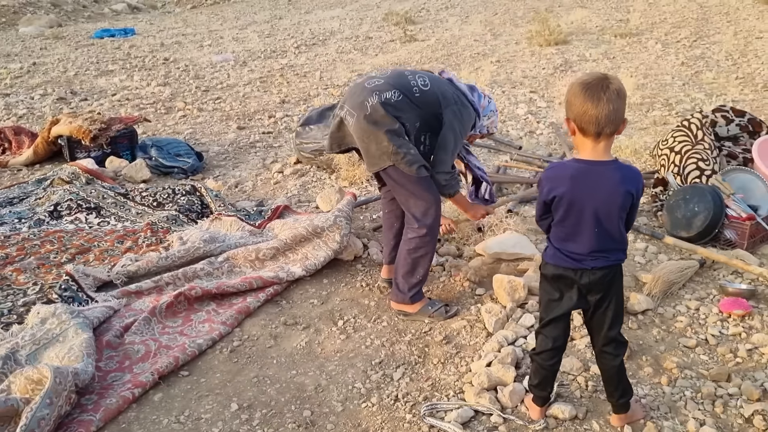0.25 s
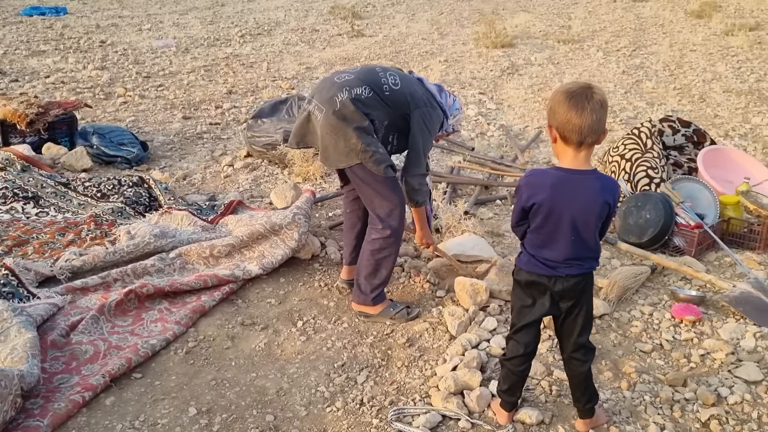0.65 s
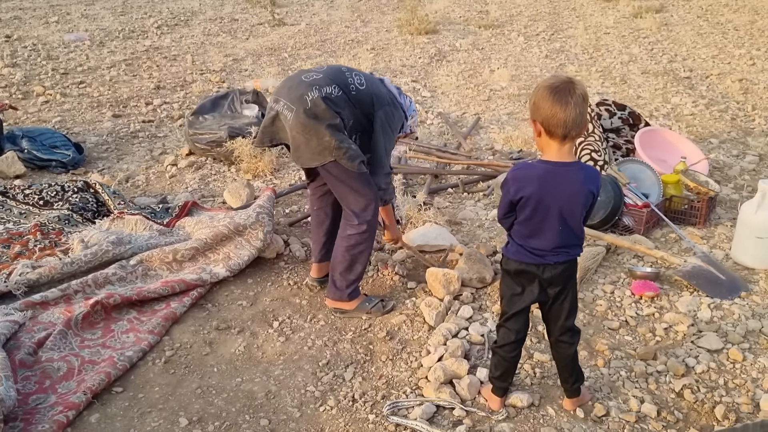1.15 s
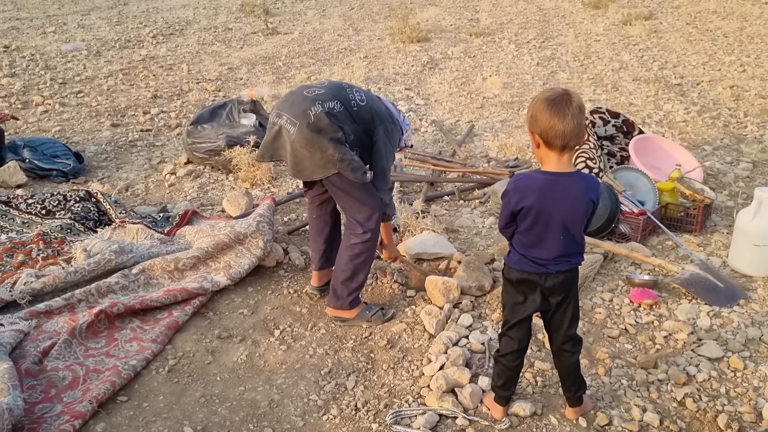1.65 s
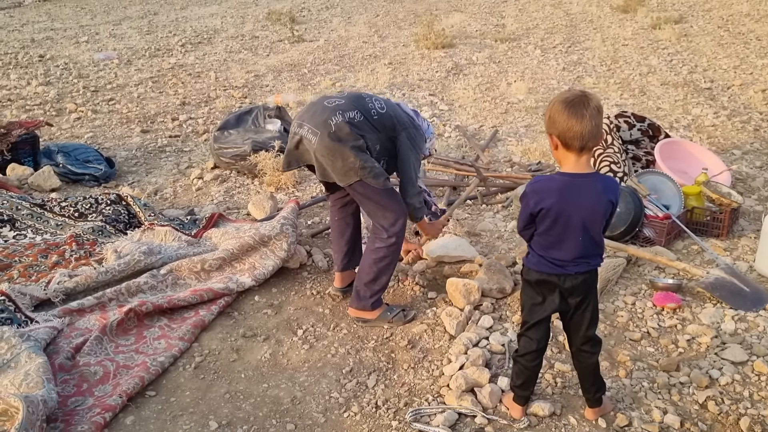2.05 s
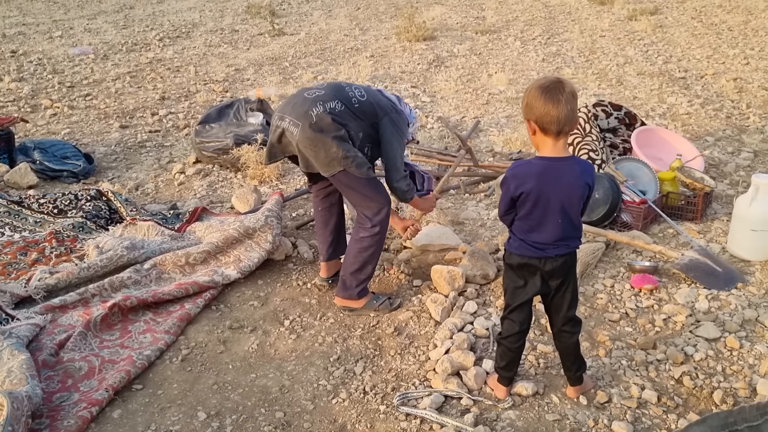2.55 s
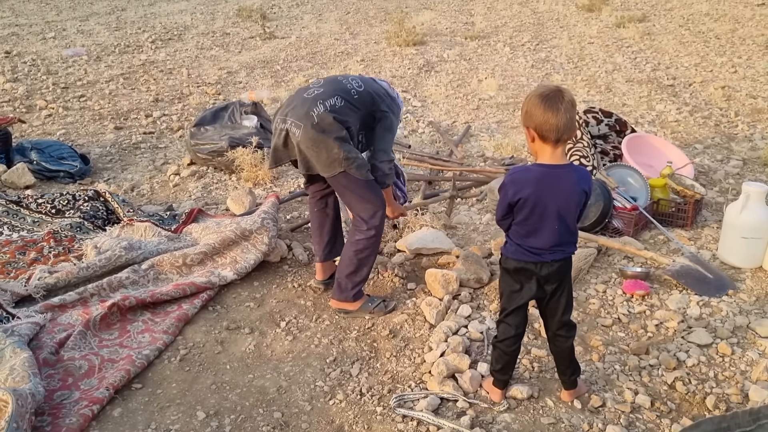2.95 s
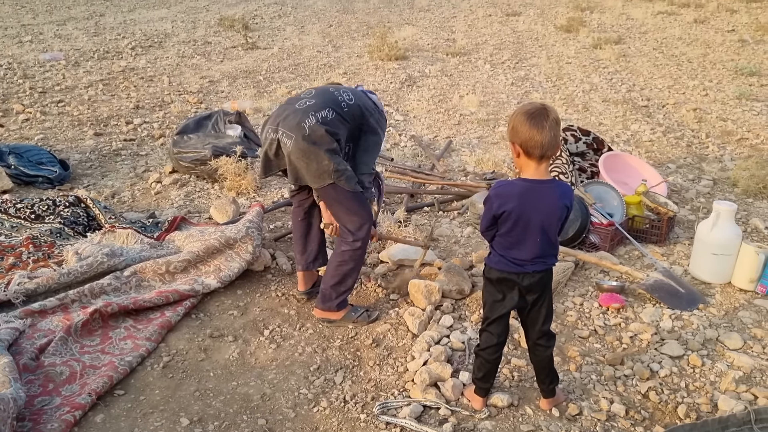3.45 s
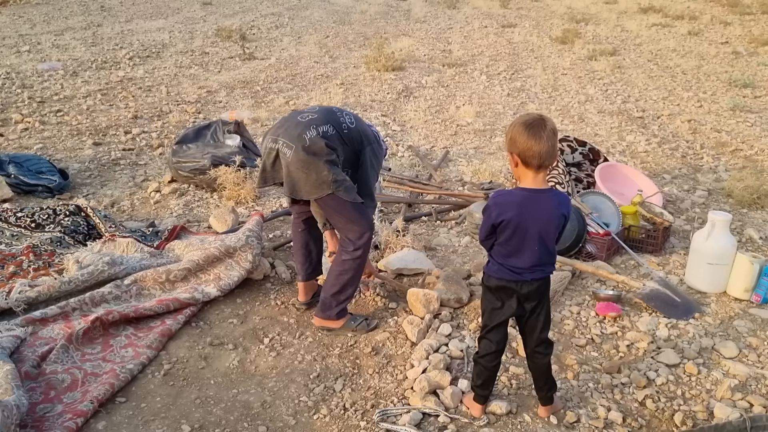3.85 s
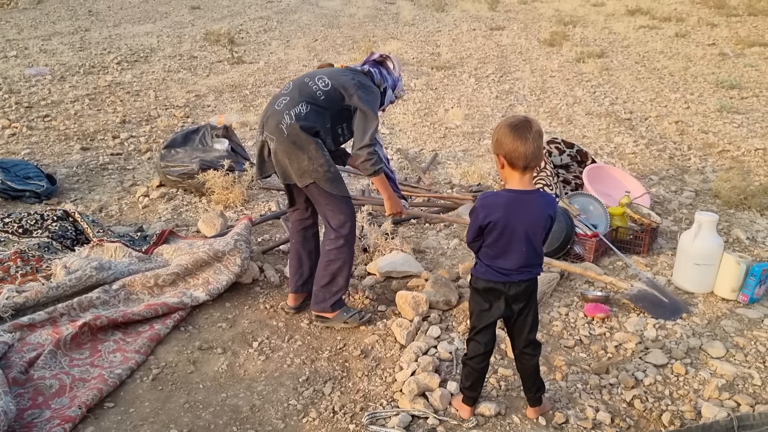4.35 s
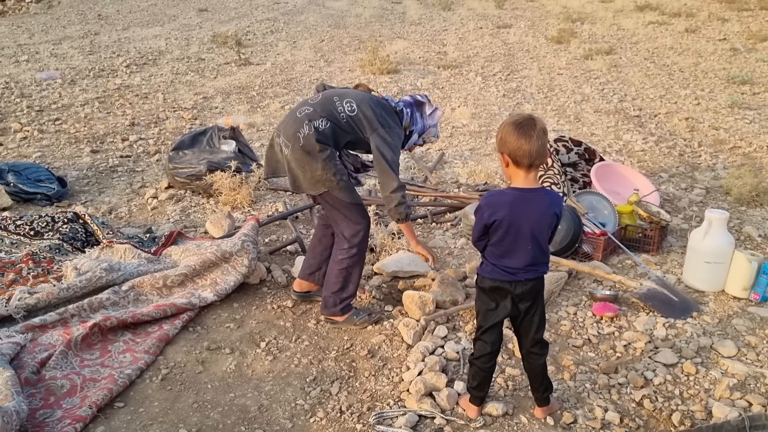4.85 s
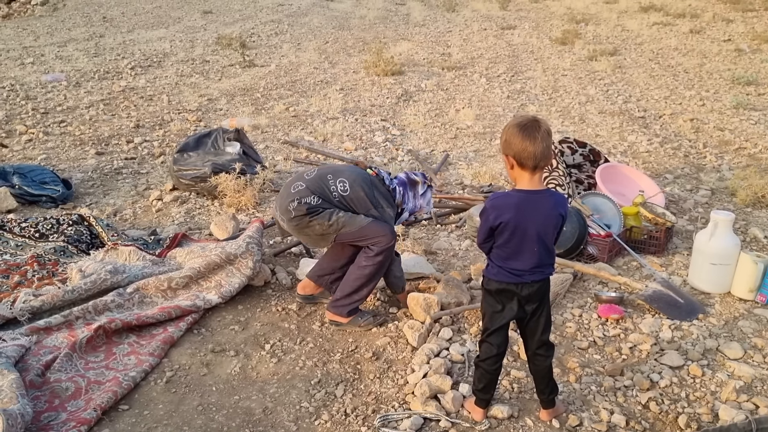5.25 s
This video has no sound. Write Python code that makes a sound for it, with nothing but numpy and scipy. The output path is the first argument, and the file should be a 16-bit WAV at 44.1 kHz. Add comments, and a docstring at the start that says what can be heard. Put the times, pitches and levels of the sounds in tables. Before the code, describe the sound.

On open dry ground, someone strikes stone on stone at a steady pace, about twice a second, each blow a short bright clack with a tiny crack. Small pebbles tick between. After a gap, a cluster of hollower knocks on a flat slab comes near the end. Wind thumps low on a phone a few metres away, strongest in the middle, over faint rustle and hiss.

```python
"""Stones are knocked together and set down on dry, open ground a few metres from a phone.
Each blow sets off fading tones, a crack and a thud: mostly a hand stone, and a flat slab around 4.6 s.
Pebbles tick as clicks and puffs of noise, and scraped grit is grainy noise that swells and fades.
Gusty wind, made of low noise and short thumps, buffets the two microphone ports, each in its own way.
Cloth and dust rustle softly over a thin hiss."""
import sys
import numpy as np
from scipy import signal
from scipy.fft import rfft, irfft, next_fast_len
from scipy.io import wavfile
from scipy.ndimage import uniform_filter1d, map_coordinates

SR = 44100
rng = np.random.default_rng(int(sys.argv[2]) if len(sys.argv) > 2 else 0)


def master(y):
    """Save y as 16-bit WAV."""
    cut = np.clip(np.atleast_2d(y).T, -1, 1)
    pcm = np.round(cut * 32767)  # scale
    wavfile.write(sys.argv[1], SR, pcm.astype(np.int16))


N = 242550  # length in samples

# In the tables, pan_db is left minus right, and density_db is the relative strength per Hz of a noise. blows of
# the hand stone; the faint rows at .5035 s and 3.279 s are echoes ringing about 14 ms after the loud blows
# before them; crack_db and thud_db are relative to the ring, treble falls off at top_hz: start_s, level_db,
# ring_hz, second_ring_hz, crack_db, thud_db, length_factor, pan_db, top_hz
HAND_BLOWS = [(.4886, -10, 5230, 4170, -3, -18, 0.44, -3.5, 14300),
              (.5035, -38.5, 4960, 4960, -11, -25, 0.72, -1.5, 9100),
              (1.0532, -32.5, 4300, 3920, 1, -14.5, 0.2, 9.5, 14000),
              (1.0578, -33.5, 4680, 3680, 8.5, -0.5, 0.14, -3, 6800),
              (1.599, -12.5, 3890, 5280, -2, -15, 0.39, -1, 13200),
              (1.6526, -52.5, 1360, 3180, 6, -12, 2.5, 1.5, 4700),
              (2.1605, -11, 7010, 4560, -8, -18, 0.56, 0, 8630),
              (2.2223, -40, 3000, 6200, 7.5, -6, 0.57, 5, 6950),
              (2.72, -38, 4800, 3870, -1, 11, 0.58, 1.5, 7860),
              (2.7721, -39.5, 7800, 6900, 9.5, 4, 0.25, -3, 8720),
              (3.258, -17, 3000, 6970, -6.5, -4, 0.94, -2, 14800),
              (3.279, -44, 4950, 4950, 2.5, -7, 0.85, 4.5, 8010),
              (3.2973, -46.5, 5230, 7080, -1, 10.5, 1.2, 1, 7470),
              (3.808, -30.5, 4800, 3870, 2, 1.5, 0.44, 4.5, 11000),
              (5.0245, -55, 1400, 2550, 9.5, 10, 1.43, 5.5, 4590)]
# knocks on the slab, mostly around 4.6 s: same columns as the blows
SLAB_KNOCKS = [(3.947, -58, 1495, 3800, 0, -27, 4, 3, 4500),
               (4.5125, -24.5, 2970, 1495, -1.5, -16, 1.03, 1.5, 9000),
               (4.5988, -14.5, 4410, 1495, -4, -2, 1.2, -1.5, 10500),
               (4.6815, -36.5, 4270, 1495, 9, -13.5, 0.48, 2.5, 11400),
               (4.6869, -26.5, 3700, 1495, -29, 6.5, 1.4, -0.5, 7860),
               (4.7237, -52.5, 700, 3800, 14, 12, 0.98, 2, 6300),
               (4.93, -51, 1495, 1495, -3, -6.5, 1.04, 2.5, 3030)]
# tones that the hand stone can ring with: pitch_hz
HAND_HZ = [1350, 2450, 3000, 3870, 4330, 4950, 5470, 6150, 6860, 7700, 8850, 10200, 11080, 12100, 13900]
# basic level and fade of each of those tones, before a blow alters them: level_db, t60_s
HAND_RING = [(-22, .025), (-23, .025), (-14, .03), (-8, .022), (-6, .025), (-3, .028), (-11, .02),
             (-12, .018), (-7, .022), (-11, .018), (-13, .02), (-20, .02), (-17, .02), (-21, .018),
             (-23, .018)]
# tones that the slab can ring with: pitch_hz
SLAB_HZ = [700, 1495, 2557, 2970, 3800, 4410, 5001, 6050, 6740, 7500, 8845, 10040, 10990]
# basic level and fade of each of those tones, before a knock alters them: level_db, t60_s
SLAB_RING = [(-9, .018), (-9, .025), (-24, .035), (-14, .026), (-19, .03), (-9, .028), (-17, .028),
             (-13, .02), (-14, .02), (-20, .022), (-30, .055), (-34, .055), (-30, .1)]
# colour of the crack of stone on stone: pitch_hz, density_db
CRACK_COLOUR = [(470, -43), (800, -16), (2130, -4), (4860, -13), (5510, -10.5), (6910, 2.5), (9450, -14),
                (12500, -10), (16000, -33)]
# fade of the echoes off the rocks around: pitch_hz, t60_s
ROCK_ECHOES = [(300, .09), (3000, 0.066), (12000, 0.025)]
# ticks of pebbles and grit: start_s, level_db, centre_hz, width_octaves, t60_s, pan_db
PEBBLE_TICKS = [(.023, -50, 6000, 0.63, 0.011, 2), (.0518, -44, 3200, 2, 0.01, 26),
                (.134, -45, 4000, 1.2, 0.016, 6), (0.144, -41.5, 1260, 1.96, 0.012, -6),
                (0.213, -50.5, 4500, 0.84, 0.024, 4), (0.2615, -23, 2220, 1.04, 0.0096, -1),
                (0.291, -43, 2080, 0.74, 0.014, -2), (.318, -53, 5000, 1.1, 0.012, 11),
                (0.331, -54, 3400, .7, 0.013, -6), (0.466, -58, 6500, 0.44, 0.0094, 4),
                (.606, -41, 7440, 0.37, 0.013, -3.5), (0.631, -54.5, 5000, 0.43, 0.086, -1.1),
                (.6973, -50, 7300, .8, 0.028, 2), (0.9982, -41, 2240, 0.41, 0.014, 13.5),
                (1.857, -57.5, 6480, 0.92, 0.031, -13), (2.1768, -26, 400, 0.38, 0.019, 6),
                (2.242, -53, 1440, 1.75, 0.1, -2), (2.3023, -56, 4320, 0.86, 0.013, -16),
                (2.5297, -46.5, 7800, 0.13, 0.02, -7.5), (2.561, -45, 6100, 1.7, 0.013, -8),
                (2.598, -50, 4070, 0.77, 0.02, -18), (2.609, -34, 4330, 0.86, 0.016, -7.5),
                (2.6148, -27.5, 7830, 0.14, 0.019, -3.5), (2.6434, -40.5, 6940, 1, 0.015, 7),
                (2.879, -56.5, 9950, 1.5, 0.015, -10), (3.3759, -53.5, 5900, 1.2, 0.01, -15),
                (3.387, -61, 5500, 0.88, .01, -9), (3.3975, -56, 6230, 0.52, 0.0096, -9),
                (3.9244, -54.5, 4200, 0.21, 0.014, 2), (4.8727, -54, 4440, 0.86, 0.015, -3.5)]
# stones and cloth dragged over grit: middle_s, length_s, level_db, centre_hz, width_octaves, pan_db
GRIT_SCRAPES = [(1.163, 0.16, -70.5, 694, 0.31, -1.5), (1.53, 0.25, -64.5, 6400, 0.33, -3.5),
                (0.176, 0.027, -62, 10900, 1.8, 11), (0.442, 0.033, -59.5, 9850, 1.3, -2.1),
                (2.613, 0.032, -58, 13800, 0.15, -13), (2.721, 0.0099, -51, 4770, 0.99, 11),
                (2.748, 0.045, -61, 4000, 0.79, 11), (3.859, 0.11, -66.5, 3300, 1.5, 2),
                (4.892, 0.062, -76.5, 2920, 1.6, 2), (2.279, 0.22, -64, 2360, 1.32, 2.5),
                (2.609, 0.053, -59.5, 5340, 0.89, 16), (2.852, 0.031, -64.5, 7340, 0.56, -6.5),
                (3.338, 0.16, -61.5, 3470, 1.9, 4.5), (3.946, 0.027, -56, 3910, 0.2, 6),
                (3.947, 0.028, -65, 8000, 0.24, -4), (4.569, .04, -59, 1930, 1.46, -3.5),
                (5.186, 0.22, -68.5, 1019, 1.02, -4.5)]
# the body of the phone shades each port for sound from the stones: pitch_hz, pan_db
PORT_SHADING = [(700, 1.5), (2500, .6), (5000, -.6), (7500, -2.5), (10000, -1.5), (12000, 0)]
# the stones lie nearer the left port, so it hears them first: pitch_hz, left_lead_s
PORT_LEAD = [(700, .00011), (1500, 0.0002), (3500, 0.00023), (5000, 0.00024), (7000, 0.0002),
             (9000, .00018)]
# single eddies bursting on the ports: middle_s, level_db, pitch_hz, pan_db
EDDIES = [(0.01, -39, 74, 2), (0.423, -35.5, 79.6, -2), (0.624, -28, 87, -2.5), (0.812, -35, 74, -8),
          (1.66, -42.5, 74, 1), (1.737, -39.5, 140, -15), (1.759, -37, 400, 5), (1.76, -40.5, 116.3, -18),
          (1.855, -42, 142, -18), (1.925, -32, 62, 0.5), (1.988, -41, 95, -8), (2.171, -39, 145, -18),
          (2.449, -38, 98, 0), (2.558, -31, 110.5, -18.5), (2.645, -17, 77.6, -2.5),
          (2.704, -32.5, 61.5, -11), (2.777, -19.5, 126.5, -8), (2.831, -42, 87.7, -4.5),
          (2.93, -46.5, 401, 14), (2.985, -44.5, 400, 10), (3.007, -38.5, 71.7, -22), (3.081, -34, 80, -8),
          (3.137, -34, 75.2, 5), (3.157, -23.5, 63, 8), (3.185, -31, 65, 4.5), (3.265, -27.5, 85, 1),
          (3.325, -20.5, 340, 3.5), (3.329, -23.5, 80.6, -3), (3.346, -19, 72, 2.5), (3.587, -36, 80, -5),
          (3.726, -31, 85, -3), (3.765, -32, 94, -0.5), (3.801, -29, 56.6, 0), (3.837, -32, 91, -8),
          (3.951, -28.5, 71, -2.5), (4, -42, 59.5, -1), (4.035, -43.5, 78, 5.5), (4.102, -34.5, 85, -0.5),
          (4.14, -35, 74, -4), (4.225, -49.5, 73, 0), (4.34, -35, 73, 4), (4.381, -42, 89.7, -6),
          (4.469, -34.5, 61, -6), (4.688, -35.5, 94.4, 4), (5.025, -36, 61.4, 3), (5.073, -49, 77, -8),
          (5.23, -44, 80, -6), (5.285, -30.5, 75, -10), (5.311, -28.5, 84, -8)]
# strength of the wind on the open right port: time_s, level_db
WIND_STRENGTH = [(0, -19.5), (.21, -54.5), (.36, -36.5), (.84, -42.5), (1.08, -42.5), (1.17, -72),
                 (1.5, -51.5), (1.62, -45), (1.78, -36), (1.98, -38.5), (2.08, -51.5), (2.17, -40),
                 (2.48, -49), (2.62, -26.5), (2.83, -40.5), (2.88, -63), (2.95, -66), (2.99, -38),
                 (3.35, -29.5), (3.39, -53.5), (3.52, -51), (3.8, -37), (4.22, -56.5), (4.32, -37.5),
                 (4.7, -42.5), (4.95, -64.5), (5.02, -53), (5.16, -51), (5.3, -29.5), (5.4, -59.5),
                 (5.5, -67)]
# colour of the low buffeting: pitch_hz, density_db
BUFFET_COLOUR = [(12, -41), (20, -7.5), (38, -2.5), (60, 0.5), (87, -2), (189, -20.5), (220, -21.5),
                 (290, -44.5), (480, -120)]
# colour of the faster flutter: pitch_hz, density_db
FLUTTER_COLOUR = [(94, -20), (160, -7.5), (232, -4.5), (296, -4), (444, -12.5), (768, -39), (1200, -55.5),
                  (1560, -84.5), (2640, -120)]
# flutter compared with the wind, when the wind is at GUST_DB; rows left, right: level_db
FLUTTER_DB = [
    [-14.5],
    [-21.5],
]
# how fast the flutter grows with the wind; rows left, right: growth_db_per_db
FLUTTER_GROWS = [
    [.8],
    [1.1],
]
# loudness of the rustle, and of the hiss on the right port: time_s, rustle_db, hiss_db
GROUND_LEVELS = [(0, -62, -58), (.2, -67, -61), (.8, -68.5, -61.5), (1.06, -72, -63), (1.28, -85.5, -72.5),
                 (1.65, -77.5, -63.5), (2.0, -80.5, -68), (2.34, -73, -71), (2.7, -76, -67),
                 (3.05, -82, -73.5), (4.4, -83, -72.5), (4.7, -68.5, -69), (4.9, -76.5, -74.5),
                 (5.5, -87.5, -74)]
# colour of the rustle of cloth and dust: pitch_hz, density_db
RUSTLE_COLOUR = [(350, -27.5), (600, 2), (1070, -10), (1400, -7), (2770, -12.5), (4440, -11), (6390, -15),
                 (7630, -7), (10000, -28), (13000, -55.5), (22000, -120)]
# colour of the hiss on the left port: pitch_hz, density_db
HISS_LEFT = [(400, -31), (800, 1), (2200, -6), (5000, -8), (7500, -10), (8700, -18), (9500, -11.5),
             (11000, -12.5), (13500, -2), (15500, -4), (16400, -28.5)]
# colour of the hiss on the right port: pitch_hz, density_db
HISS_RIGHT = [(400, -34.5), (800, -1), (2200, -8), (5000, -7.5), (6200, -11), (7500, -0.5), (8700, -6),
              (9600, -13.5), (11000, -11), (13500, 1.1), (15500, -2.5), (16400, -29.5)]

GUST_DB = -40  # wind level at which FLUTTER_DB holds
SHELTER_DB, SHELTER_HZ = -43, 262  # left buffeting against right; pitch below which left flutter fades
LUMP_DB, BURST_DB = 3.5, 6.5  # depth of the slow lumps and of the fast bursts
SPRAY_DB, SPRAY_CYCLES = -20, 1  # flutter around each eddy: level against it, and reach to either side
TOP_HZ = 16300  # band limit of the phone


def stone(rows, modes_hz, rings, focus_db, thud_hz, grit_hz, rise_s, thud_t60):
    """Each blow rings the tones near its two ring pitches most, cracks, and thuds into the soil."""
    out, t = np.zeros((2, N + SR)), np.arange(SR // 5) / SR
    hz = np.array(modes_hz)[:, None]
    level_db, t60 = np.transpose(rings)[:, :, None]
    attack = np.tanh(t / rise_s)
    thud_colour = [(100, -60), (thud_hz / 2, -8), (thud_hz, 0), (2 * thud_hz, -8), (3000, -40)]
    for s, db, ring_hz, second_hz, crack_db, thud_db, length, pan_db, top_hz in rows:
        # tones close to either ring pitch get a boost
        distance = np.log(hz / [ring_hz, second_hz]) / 0.043
        near_db = focus_db * np.exp(-distance ** 2).max(axis=1, keepdims=True)

        # no two blows are alike, and loose contact makes each tone flicker
        level_chance, phase_chance = rng.standard_normal((2, len(rings), 1))
        chatter = rng.standard_normal((len(rings), len(t)))
        for _ in range(2):
            chatter = uniform_filter1d(chatter, size=130)
        rough_db = 1.2 * level_chance + 2.5 * unit(chatter)

        # hand and soil choke the ring ever faster
        fall_db = 60 * (t / (t60 * length)) ** 1.5
        tones = np.sin(2 * np.pi * hz * t + 0.25 * phase_chance)
        ring = (amp(level_db + near_db + rough_db - fall_db) * tones).sum(axis=0) * attack

        # a smooth face cracks duller, with a lower grit_hz
        grit = filtered(noise(CRACK_COLOUR, len(t)), lambda f: 1 / (1 + (f / grit_hz) ** 6))
        crack = grit * amp(-60 * t / (0.038 * length)) * attack

        # each blow has its own treble limit
        clack = ring / np.abs(ring).max() + amp(crack_db) * crack
        clack = filtered(clack, lambda f: 1 / (1 + 1j * f / top_hz - (f / top_hz) ** 2) ** 2)

        thud = noise(thud_colour, len(t)) * amp(-60 * t / thud_t60)
        thud *= 1 - np.exp(-t / 0.0017)  # soft ground gives way slowly
        add(out, s, amp(db) * (clack + amp(thud_db) * thud), pan_db)
    return out[:, :N]


def hand_stone():
    """The hand stone strikes with a rough face: a bright crack and a low, longer thud."""
    return stone(HAND_BLOWS, HAND_HZ, HAND_RING, focus_db=12.5, thud_hz=392, grit_hz=15820,
                 rise_s=0.0013, thud_t60=0.035)


def slab():
    """The flat slab rings with its own tones, over a duller crack and a shorter, higher thud."""
    return stone(SLAB_KNOCKS, SLAB_HZ, SLAB_RING, focus_db=17.0, thud_hz=700, grit_hz=8060,
                 rise_s=0.0014, thud_t60=0.023)


def pebbles():
    """Small stones and grit do not ring: one sharp click and a short broad puff around a centre."""
    out, t = np.zeros((2, N + SR)), np.arange(SR // 8) / SR
    impulse = 1. * (np.arange(len(t)) == 40)
    for s, db, hz, octaves, t60, pan_db in PEBBLE_TICKS:
        colour = band(hz, octaves)
        click = filtered(impulse, lambda f: amp(along(colour, f)))
        puff = amp(-60 * t / t60) * np.tanh(t / 0.0018) * noise(colour, len(t))
        snap = 14 * np.exp(-t60 / .007)  # the shorter the contact, the more click
        add(out, s, amp(db) * (puff + snap * click / click.max()), pan_db)
    return out[:, :N]


def scrapes():
    """Dragging over grit gives dense grains in one broad band that swell and fade with the stroke."""
    out, t = np.zeros((2, N)), np.arange(N) / SR
    for s, length, db, hz, octaves, pan_db in GRIT_SCRAPES:
        grit_db = 3.5 * wobble(150)[0] + 2.5 * wobble(30)[0]
        grains = unit(amp(grit_db) * noise(band(hz, octaves), N))
        stroke = np.exp(-(2 * (t - s) / length) ** 4)
        out += amp(db) * panned(pan_db) * stroke * grains
    return out


def thumps():
    """Each eddy is a push and a pull of air, about a cycle and a half long, with a spray of flutter."""
    out, t = np.zeros((2, N)), np.arange(N) / SR
    flutter = amp(SPRAY_DB) * noise(FLUTTER_COLOUR, (2, N))
    for s, db, hz, pan_db in EDDIES:
        cycles = hz * (t - s)
        phase = rng.uniform(0, 2 * np.pi, (2, 1))  # each port gets its own
        push = np.exp(-(cycles / 0.56) ** 2) * np.sin(2 * np.pi * cycles + phase)
        spray = np.exp(-(cycles / SPRAY_CYCLES) ** 2) * flutter
        out += amp(db) * panned(pan_db) * (push + spray)
    return out


def wind():
    """One strength drives the lumpy buffeting, mostly on the right port, and the flutter on both."""
    strength_db, = curves(WIND_STRENGTH)
    lump_db = LUMP_DB * wobble(14)
    burst_db = lump_db + BURST_DB * wobble(40)

    buffet = unit(amp(lump_db) * noise(BUFFET_COLOUR, (2, N)))
    buffet_db = strength_db + np.array([[SHELTER_DB], [0]])

    left, right = noise(FLUTTER_COLOUR, (2, N))
    left = unit(filtered(left, lambda hz: 1 - 1 / (1 + (hz / SHELTER_HZ) ** 4)))
    flutter = unit(amp(burst_db) * np.array([left, right]))
    growth_db = np.array(FLUTTER_GROWS) * (strength_db - GUST_DB)
    flutter_db = GUST_DB + np.array(FLUTTER_DB) + growth_db
    return amp(buffet_db) * buffet + amp(flutter_db) * flutter


def ground():
    """Cloth and dust rustle near the stones, over a smooth hiss that each port colours in its own way."""
    rustle_db, hiss_db = curves(GROUND_LEVELS)
    shared, separate = noise(RUSTLE_COLOUR, N), noise(RUSTLE_COLOUR, (2, N))
    grain_db = 2.5 * wobble(120)[0]
    swell_db = 0.5 * wobble(10)[0]
    rustle = unit(amp(swell_db + grain_db) * (shared + 0.5 * separate))
    hiss = np.array([amp(-5.0) * noise(HISS_LEFT, N), noise(HISS_RIGHT, N)])
    return amp(rustle_db) * rustle + amp(hiss_db) * hiss


def amp(db):
    """Turn decibels into a gain."""
    return 10 ** (np.asarray(db) / 20)


def panned(pan_db):
    """Left and right gains that differ by pan_db."""
    return amp([[pan_db / 2], [-pan_db / 2]])


def unit(x):
    """Scale a sound to an rms of 1."""
    return x / np.sqrt(np.mean(x ** 2) + 1e-20)


def along(points, hz):
    """Read a curve of (Hz, value) points on a log pitch axis."""
    f, v = np.transpose(points)
    return np.interp(np.log(hz + 1), np.log(f + 1), v)


def band(hz, octaves):
    """A broad hump around a centre, as (Hz, dB) points."""
    return [(hz / 8 ** octaves, -35), (hz / 2 ** octaves, -7), (hz, 0),
            (hz * 2 ** octaves, -9), (hz * 8 ** octaves, -45)]


def curves(rows):
    """One value per sample for each column after the time."""
    s, *cols = np.transpose(rows)
    return [np.interp(np.arange(N) / SR, s, c) for c in cols]


def wobble(rate):
    """A smooth random curve for each port, with rate random points a second."""
    knots = rng.standard_normal((2, int(N * rate / SR) + 4))
    return np.array([map_coordinates(k, [np.arange(N) * rate / SR]) for k in knots])


def filtered(x, response):
    """Multiply the spectrum of x by a response that depends on pitch."""
    m = next_fast_len(x.shape[-1] + 8192)
    spectrum = rfft(x, m) * response(np.fft.rfftfreq(m, 1 / SR))
    return irfft(spectrum, m)[..., :x.shape[-1]]


def noise(colour, shape):
    """Coloured noise with an rms of 1."""
    return unit(filtered(rng.standard_normal(shape), lambda hz: amp(along(colour, hz))))


def add(track, s, sound, pan_db):
    """Lay a sound into both channels, each with its own tail of echoes that fades by pitch."""
    hz, t, z = signal.stft(rng.standard_normal((2, 6000)), SR, nperseg=128)
    fade = amp(-60 * t / along(ROCK_ECHOES, hz)[:, None])
    tail = signal.istft(z * fade, SR, nperseg=128)[1]
    tail /= np.linalg.norm(tail[0])
    late = np.pad(sound, (130, 0))[None]  # echoes start 130 samples (3 ms) later
    wet = signal.fftconvolve(late, tail, axes=1)[:, :len(sound)]
    track[:, round(s * SR):][:, :len(sound)] += (sound + amp(-12) * wet) * panned(pan_db)


def scene():
    """Sound from the stones reaches the left port first; wind arises at the ports."""
    near = hand_stone() + slab() + pebbles() + scrapes()
    side = np.array([[1], [-1]])  # left, right

    def ports(hz):
        """Time shift and shading of each port."""
        shift = np.exp(1j * np.pi * hz * along(PORT_LEAD, hz) * side)
        return shift * amp(side * along(PORT_SHADING, hz) / 2)

    return filtered(near, ports) + thumps() + wind() + ground()


def record(dry):
    """The phone cuts steeply above its band limit."""
    return filtered(dry, lambda hz: 1 / (1 + (hz / TOP_HZ) ** 120))


dry = scene()
out = record(dry)
master(out)
```